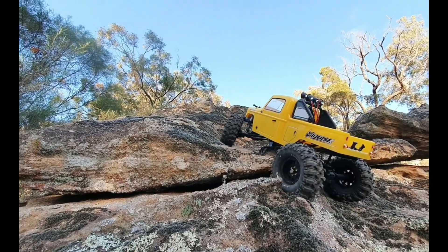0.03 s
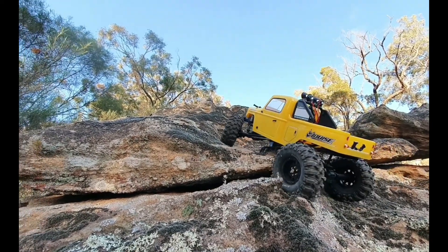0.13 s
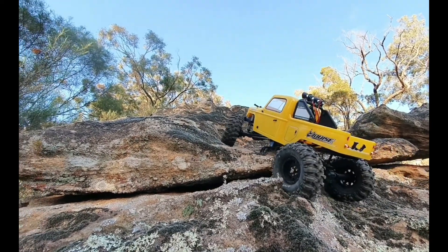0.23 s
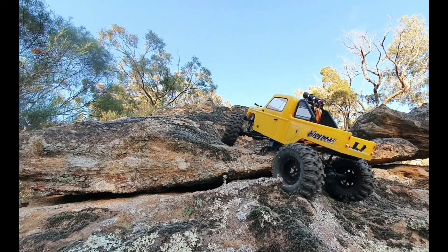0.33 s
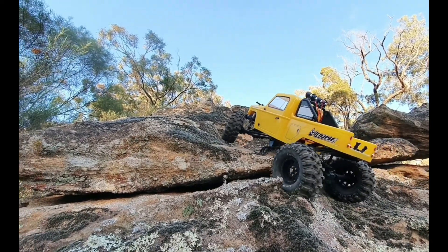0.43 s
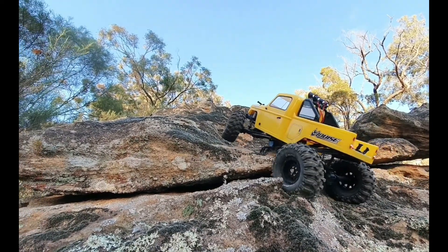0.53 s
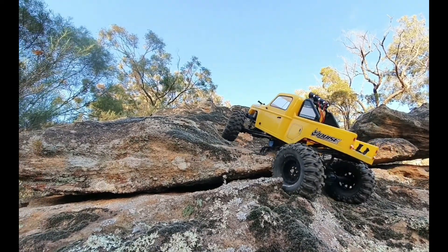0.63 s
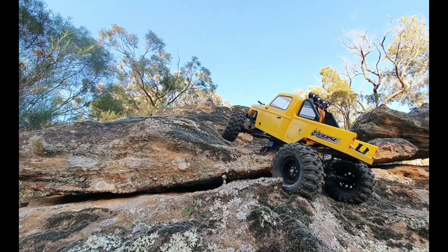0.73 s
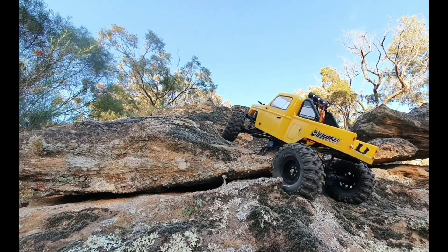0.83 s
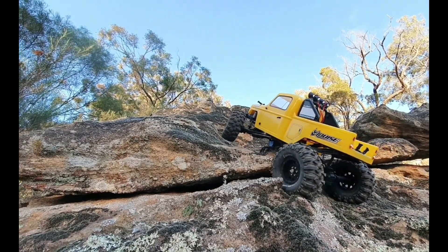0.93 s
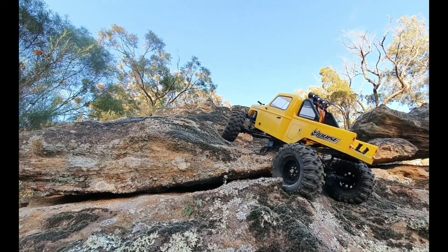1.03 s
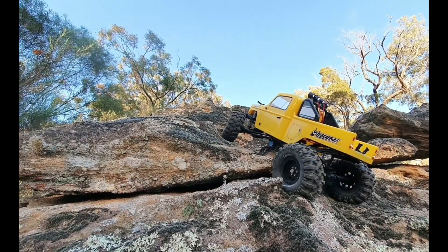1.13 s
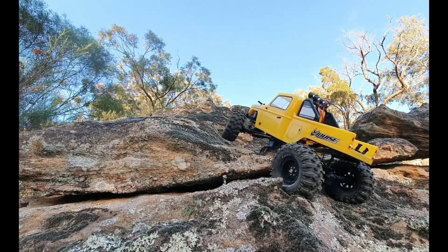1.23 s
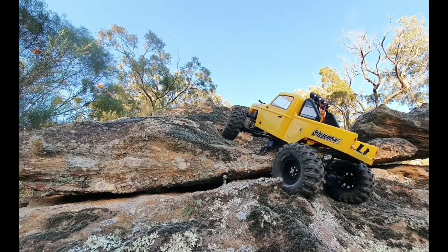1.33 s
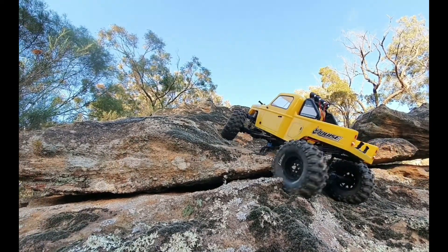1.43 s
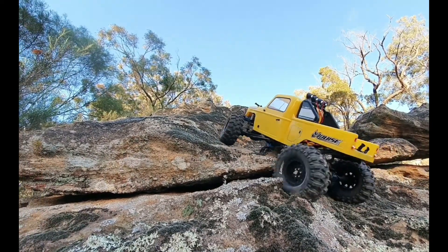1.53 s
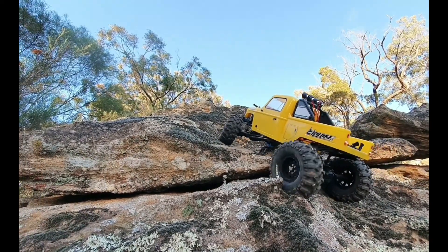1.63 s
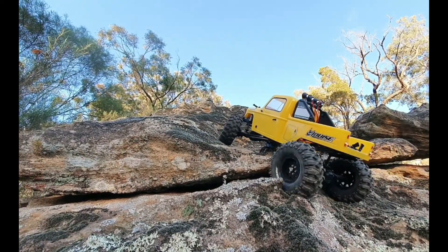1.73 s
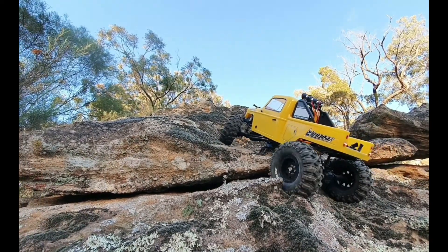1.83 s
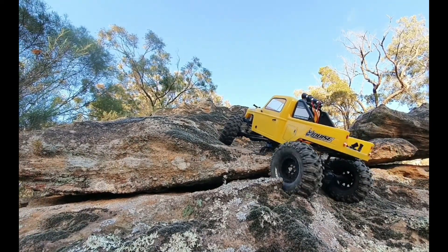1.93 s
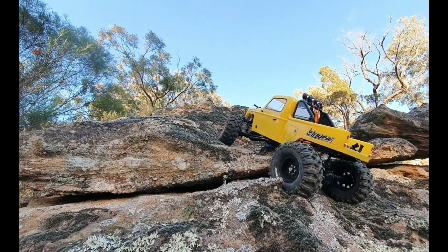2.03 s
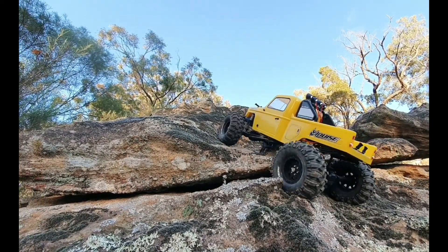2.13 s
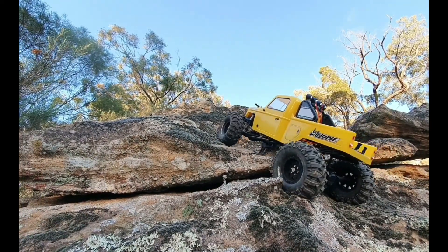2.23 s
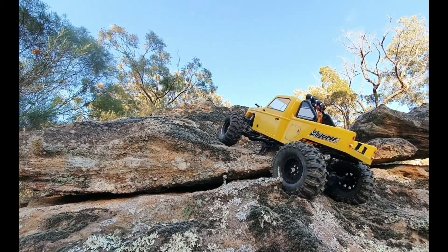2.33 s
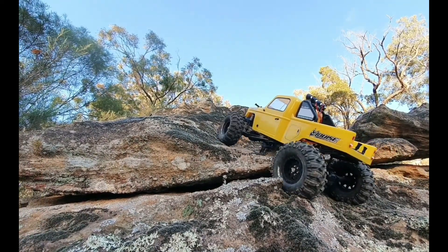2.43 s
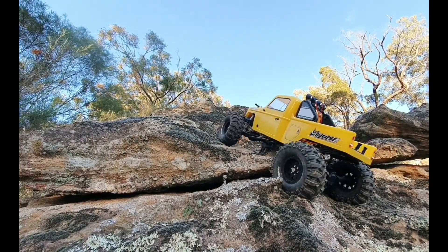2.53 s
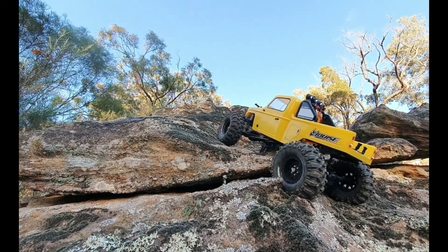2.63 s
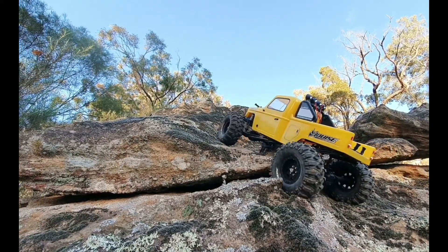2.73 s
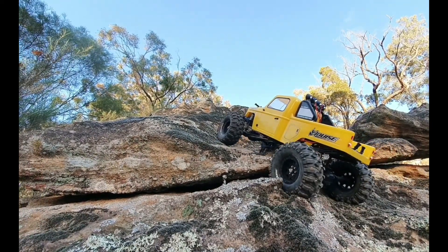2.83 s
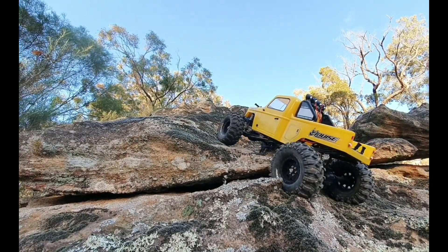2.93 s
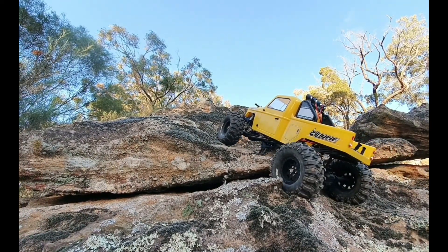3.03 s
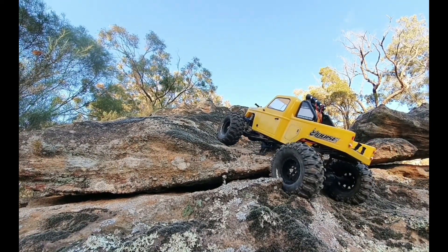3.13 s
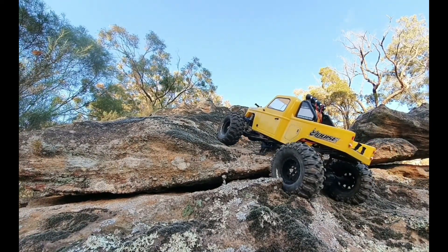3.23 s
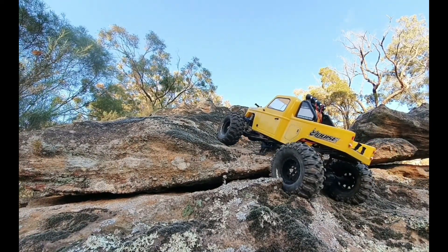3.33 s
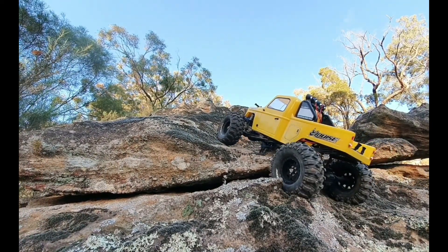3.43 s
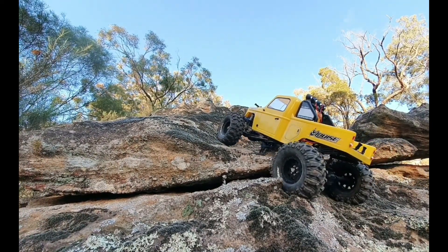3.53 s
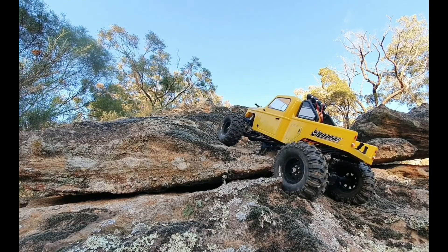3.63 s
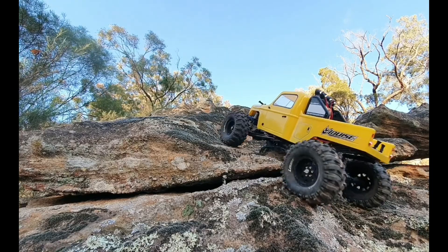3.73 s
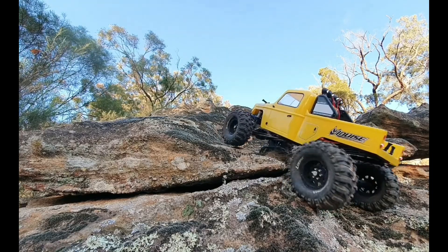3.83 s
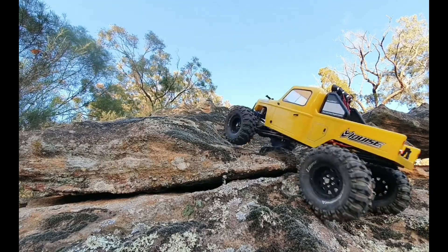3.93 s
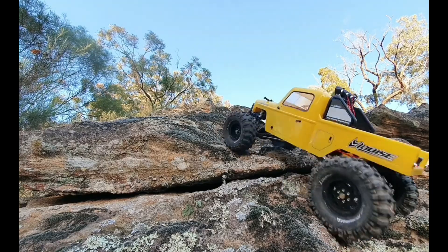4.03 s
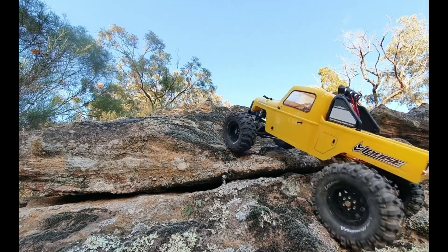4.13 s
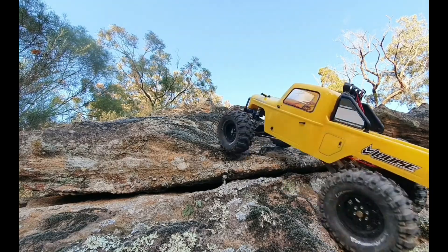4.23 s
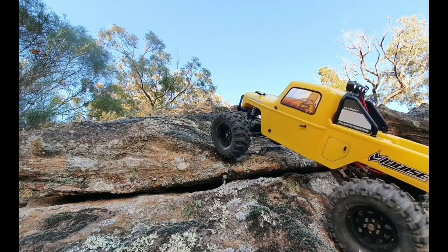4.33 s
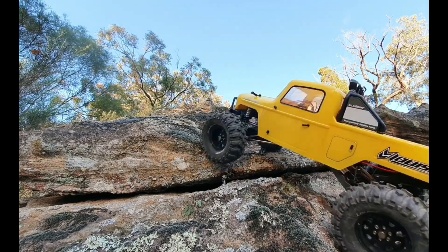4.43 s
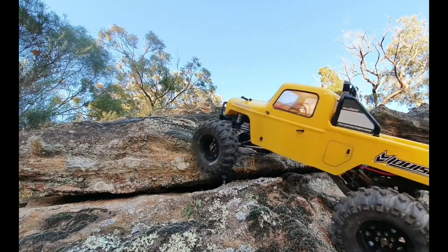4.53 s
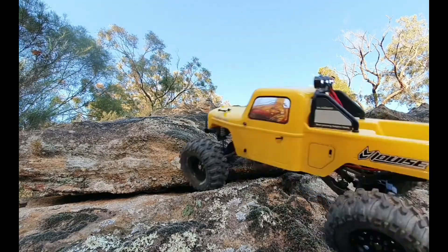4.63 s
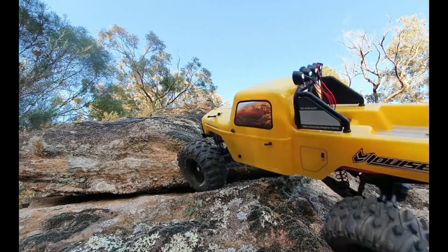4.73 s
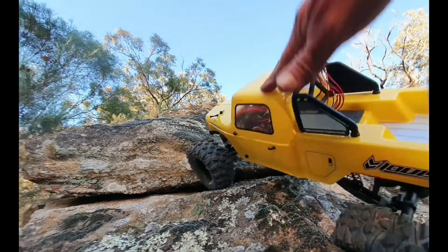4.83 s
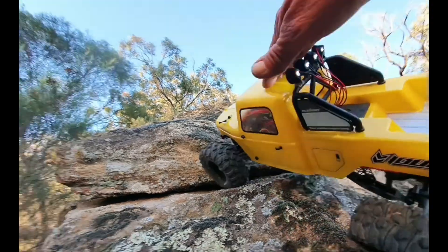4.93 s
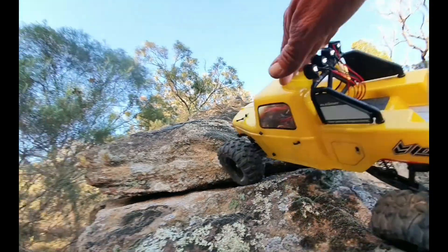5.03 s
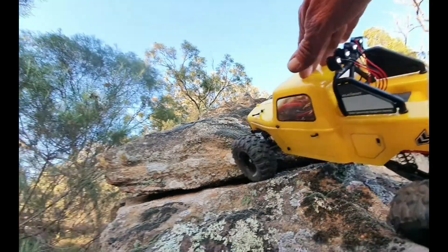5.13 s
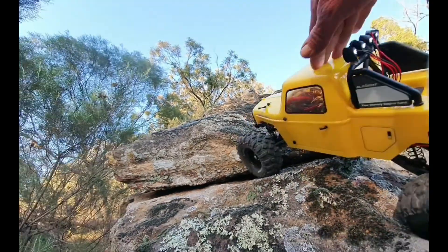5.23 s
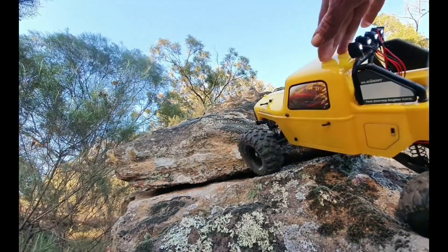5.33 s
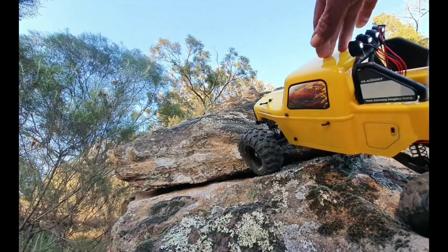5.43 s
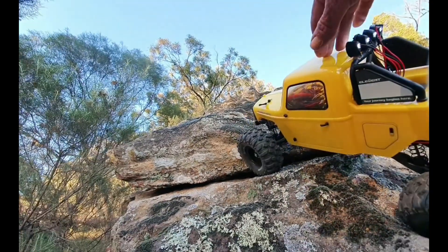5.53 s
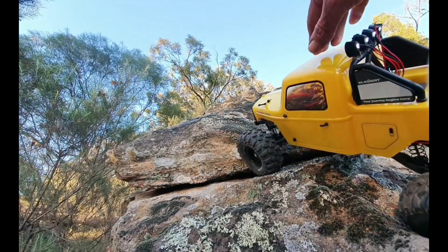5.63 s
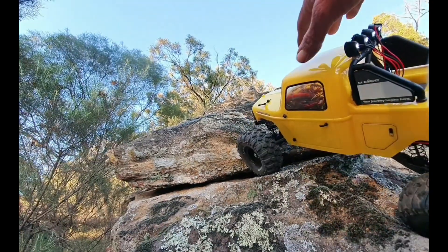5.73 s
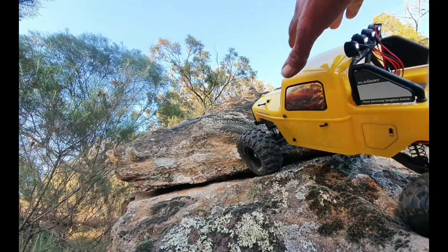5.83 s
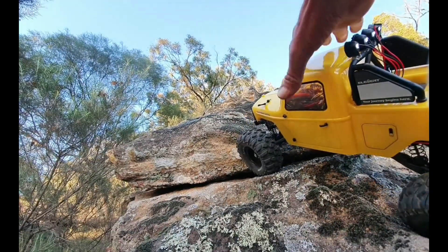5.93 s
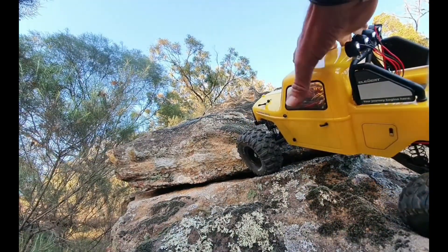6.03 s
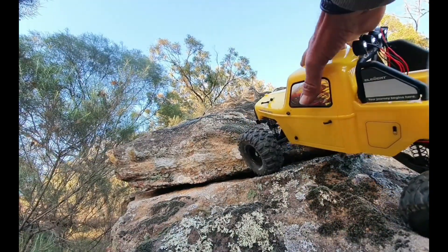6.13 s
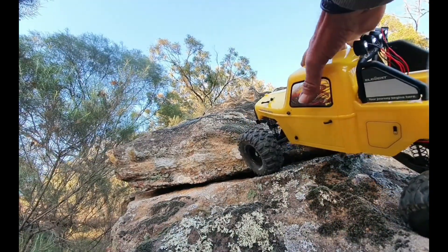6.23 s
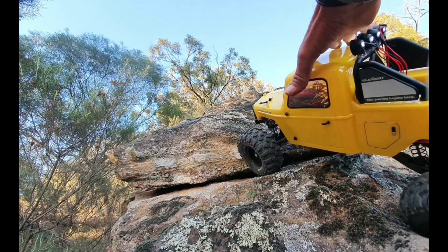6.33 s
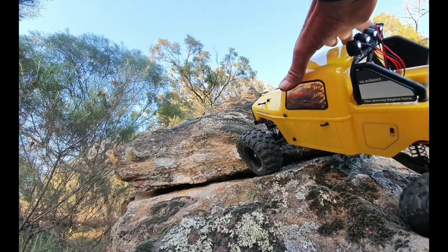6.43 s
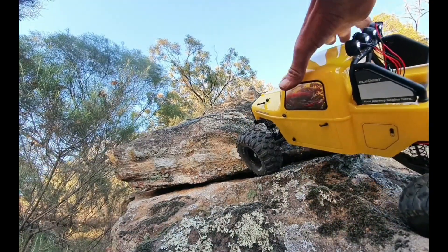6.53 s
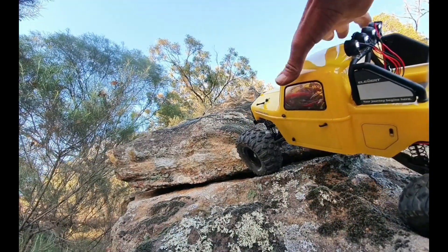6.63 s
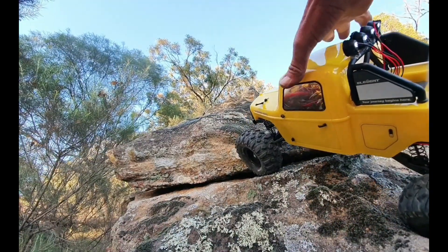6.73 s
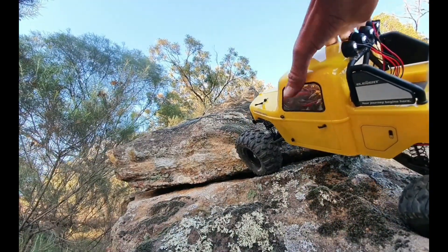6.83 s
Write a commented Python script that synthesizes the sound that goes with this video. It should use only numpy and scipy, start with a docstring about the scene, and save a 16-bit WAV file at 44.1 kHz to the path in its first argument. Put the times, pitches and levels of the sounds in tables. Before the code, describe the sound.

Close stereo microphone on a rocky outdoor spot, the truck slightly right. Faint rubbing, low hum and intermittent piercing electric whine come first, then a gritty burst of tyre scrubbing with clicks and gear rasp. A short skid squeaks and hisses. After a lull with faint distant chirping, dull tyre bumps gather into a loud plastic-shell clack with a deep bounce, followed by quiet scuffs and faint air.

```python
"""Tyres scrub and crunch on sandstone in short bursts, a high whine comes and goes, and one tyre squeals. Then come
bumps, a hard knock and small shifts: a radio-controlled truck claws at a ledge, rolls back and is moved by hand.
Filtered noise makes the rubbing, grit, gears and wind; fading tones make the knocks and bounces on the tyres.
Wavering tones make the whine, squeal and low hum. Faint air and far chirping lie underneath."""
import sys
import numpy as np
from scipy import signal
from scipy.fft import rfft, irfft, next_fast_len
from scipy.io import wavfile
from scipy.ndimage import uniform_filter1d, map_coordinates

SR = 44100
rng = np.random.default_rng(int(sys.argv[2]) if len(sys.argv) > 2 else 0)


def to_wav(sig):
    """Store sig (one row per channel, or 1-D mono) as 16-bit WAV at the path in sys.argv[1].

    Samples outside -1..1 are clipped; the rate is SR.
    """
    pcm = np.clip(np.atleast_2d(sig), -1, 1) * 32767
    pcm = np.round(pcm).astype(np.int16)
    wavfile.write(sys.argv[1], SR, pcm.T)  # frames by channels


N = 303716
TIME = np.arange(N) / SR  # seconds

# sharp noise of a strike or a bursting grain: (frequency [Hz], relative level per Hz [dB])
CRACK_COLOUR = [(400, -36), (1200, 0), (2700, -3), (4200, -0.5), (5200, -7), (6100, -4.5), (7200, -9.5),
                (11000, -15.5), (16000, -30.5)]


def amp(db):
    """Turn decibels into a gain."""
    return 10 ** (np.asarray(db) / 20)


def unit(x):
    """Scale to an average (rms) level of 1."""
    return x / np.sqrt(np.mean(x ** 2) + 1e-20)


def along(points, hz):
    """Read a curve of (frequency, value) points, with frequency on a log scale."""
    point_hz, values = np.transpose(points)
    return np.interp(np.log(hz + 1), np.log(point_hz + 1), values)


def wobble(rate):
    """Draw a smooth random curve through `rate` random points a second."""
    knots = rng.standard_normal(int(N * rate / SR) + 4)
    return map_coordinates(knots, [TIME * rate])


def filtered(x, response):
    """Multiply the spectrum of x by a response that depends on frequency."""
    size = next_fast_len(N + SR // 2)
    spectrum = rfft(x, size) * response(np.fft.rfftfreq(size, 1 / SR))
    return irfft(spectrum, size)[..., :N]


def through(x, kernel):
    """Pass both channels through one short response, scaled to unit energy."""
    return signal.fftconvolve(x, kernel[None] / np.linalg.norm(kernel), axes=1)[:, :N]


def coloured(x, spectrum):
    """Give x the colour of a spectrum with a filter that never sounds ahead of its input."""
    size = 4096
    cepstrum = irfft(np.log(amp(along(spectrum, np.fft.rfftfreq(size, 1 / SR)))))
    # folding the cepstrum packs the response as early as it can be (minimum phase)
    fold = np.r_[1, np.full(size // 2 - 1, 2), np.zeros(size // 2)]
    return through(x, irfft(np.exp(rfft(cepstrum * fold))))


def spread(pair):
    """Mix two unrelated signals into left and right, with a likeness that depends on frequency."""
    # (frequency [Hz], left-right likeness [0 to 1])
    likeness = [(100, 0.65), (800, 0.72), (1500, 0.15), (5000, 0.3), (7500, 0.33), (13000, 0.1994)]

    def mix(hz):
        turn = np.arccos(np.clip(along(likeness, hz), 0, 1)) / 2
        return np.array([np.cos(turn), np.sin(turn)])

    mid, side = filtered(pair, mix)
    return np.array([mid + side, mid - side])


def grains(rate, scatter_db, bed):
    """Friction noise: tiny crunches of unequal size at random moments, `rate` a second, on a smooth bed."""
    sizes = amp(scatter_db * np.minimum(rng.standard_normal(N), 2))
    hits = (rng.random(N) < rate / SR) * sizes
    crunch = np.convolve(hits, np.hanning(SR // 700), "same")  # each lasts 1.4 ms
    return unit((unit(crunch) + bed) * rng.standard_normal((2, N)))


def patchy(x, depth_db):
    """Shift the colour from moment to moment, as when the points of contact move."""
    tiles = signal.stft(x, nperseg=512)[2]
    field = rng.standard_normal(tiles.shape[1:])
    # smooth the random gains over frequency (axis 0) and time (axis 1)
    for axis, size in [(0, 3), (0, 2), (1, 7), (1, 5)]:
        field = uniform_filter1d(field, size, axis)
    shifted = tiles * amp(depth_db * unit(field))
    return unit(signal.istft(shifted, nperseg=512)[1][:, :N])


def swell(start, hold, rise, fall, db):
    """Gain of one attack, hold and release; rise and fall are the times for 20 dB."""
    before = np.maximum(start - TIME, 0) / rise
    after = np.maximum(TIME - start - hold, 0) / fall
    return amp(db) * 10 ** -np.minimum(before + after, 10)


def swells(rows, *slopes):
    """Add overlapping swells in power; slopes are a rise and fall shared by all rows."""
    return np.sqrt(sum(swell(*row[:-1], *slopes, row[-1]) ** 2 for row in rows))


def add(track, s, sound):
    """Mix a sound into the track at s seconds."""
    room = track[..., round(s * SR):][..., :sound.shape[-1]]
    room += sound[..., :room.shape[-1]]


def ring(t, scatter_db, damping):
    """The chassis and shell ring as fading tones, with new strengths for each blow."""
    # chassis and plastic shell: (frequency [Hz], relative level [dB], time to fall 60 dB at damping 1 [s])
    shell_modes = [(165, -17.5, 0.12), (345.8, -9, 0.18), (450, -2, 0.062), (557, 2.5, 0.039),
                   (624, 4, 0.039), (815, -6, 0.082), (940, -19, 0.11), (1179, -15.5, 0.13),
                   (1434, -24, 0.051)]
    hz, db, t60 = np.transpose(shell_modes)[:, :, None]
    strengths = db + scatter_db * rng.standard_normal(hz.shape)
    gains = amp(strengths - 60 * t * damping / t60)
    return np.sum(gains * np.sin(2 * np.pi * hz * t), axis=0)


def rattled(x):
    """Small plastic parts resonate when shaken: x through their short, fading tones."""
    # small plastic parts: (frequency [Hz], width [Hz], relative level [dB])
    part_modes = [(1145, 72, 0), (1276, 93, 1.5), (1652, 47, 2), (1775, 190, 0.5), (2220, 93, -2.5),
                  (2320, 69, 2), (2596, 260, 1.5), (3340, 880, -1), (4650, 1900, -15), (5840, 150, -13.5)]
    hz, width, db = np.transpose(part_modes)[:, :, None]
    t = TIME[:SR // 16]
    fade = width * np.exp(-np.pi * width * t)
    signs = np.resize([1, -1], hz.shape)
    return through(x, np.sum(amp(db) * fade * np.cos(2 * np.pi * hz * t) * signs, axis=0))


def ticks():
    """Single sand grains burst as sparse, sharp snaps of unequal size."""
    ticks_per_s, scatter_db, decay_s = 30, 4, .001
    sizes = amp(scatter_db * np.clip(rng.standard_normal(N), -2, 1.5))
    hits = (rng.random(N) < ticks_per_s / SR) * sizes
    snaps = signal.fftconvolve(hits, np.exp(-TIME[:SR // 100] / decay_s))[:N]
    return unit(coloured(snaps * rng.standard_normal((2, N)), CRACK_COLOUR))


def tyres():
    """Rubber lugs catch and let go, shaking shell and small parts, while sand grains crack under them."""
    # The next four tables share their columns; rise and fall are times for 20 dB, levels precede the trims:
    # (start [s], hold [s], rise [s], fall [s], scrub level [dB], rattle level [dB], sand level [dB])
    # a tyre slips over the rock
    scrapes = [(0.0, 0.062, .05, 0.12, -60.5, -65, -72.5), (0.165, 0.042, 0.13, 0.17, -73.5, -79, -69),
               (0.533, 0.26, 0.19, 0.2, -63.5, -68, -70), (0.72, 0.017, 0.037, 0.027, -51, -54, -62.5),
               (0.746, 0.024, .04, 0.41, -56, -68.5, -69.5), (1.553, 0.037, 0.073, .1, -50.5, -56, -64),
               (1.646, .1, 0.073, 0.15, -41.5, -51, -61.5), (1.746, .11, .06, 0.085, -38, -45, -54.5),
               (1.954, 0.017, 0.022, 0.11, -55, -63.5, -66),
               (2.993, 0.054, 0.087, 0.098, -64, -72.5, -76.5), (3.848, 0.14, 0.078, 0.092, -60, -68, -82),
               (4.013, .035, 0.13, 0.088, -53.5, -59, -73.5), (4.23, 0.083, 0.029, 0.061, -61, -74, -69),
               (4.848, 0.076, 0.025, 0.041, -42.5, -50.5, -61.5),
               (5.059, 0.054, 0.011, 0.083, -39, -46, -57), (5.291, 0.11, .1, 0.134, -64.5, -66, -75),
               (5.56, 0.05, 0.29, 0.14, -69.5, -75, -81), (6.346, 0.17, 0.15, 0.11, -68, -74, -77.5)]
    # the truck rolls back down over loose sand
    roll = [(3.87, 1.166, .065, 0.35, -62.5, -68.5, -70)]
    # a very faint, steady rubbing noise runs under the first 3.6 s
    faint_rubbing = [(0.0, 3.6, .12, 0.47, -86.5, -86.5, -90)]
    # a tyre skids on the spot
    spin = [(2.197, 0.14, 0.045, .1, -52, -58, -73)]
    # tread lugs flop onto the rock with a dull bump: (start [s], hold [s], level [dB])
    bumps = [(4.172, 0.012, -54.5), (4.265, 0.0041, -51), (4.3, 0.025, -47.5), (4.4, 0.042, -52.5),
             (4.478, 0.032, -46.5), (4.55, 0.013, -53.5), (4.69, 0.032, -48.5), (4.748, 0.024, -39),
             (5.365, 0.021, -59.5), (5.705, 0.023, -68), (6.36, 0.026, -54), (6.485, 0.011, -59)]
    # sliding rubber: (frequency [Hz], relative level per Hz [dB])
    slide_colour = [(25, -41), (70, -5.5), (140, -2), (250, -7.5), (430, -0.5), (650, -4.5), (850, -4.5),
                    (1150, -9), (1500, -14.5), (2500, -22), (6000, -56)]
    # lugs flopping on rock: (frequency [Hz], relative level per Hz [dB])
    flop_colour = [(25, -42), (70, 1), (140, 1.5), (240, -6), (430, 1.5), (650, -4.5), (880, -8),
                   (1150, -12), (1500, -17.5), (2500, -24), (6000, -48)]
    # crunching sand: (frequency [Hz], relative level per Hz [dB])
    grit_colour = [(800, -26.5), (2000, -13.5), (3500, -2.5), (5000, -1), (7000, -4), (10000, -6.5),
                   (13000, -10.5), (16000, -15.5)]
    scrub_trim_db, rattle_trim_db, sand_trim_db = 1.0, 0.5, 4
    bump_rise_s, bump_fall_s, bump_rattle_db, tick_db = 0.024, 0.053, -16, -11

    work = np.array([*scrapes, *roll, *faint_rubbing, *spin])
    rubbing, shaking, crushing = (swells(np.column_stack([work[:, :4], db])) for db in work[:, 4:].T)
    bumping = swells(bumps, bump_rise_s, bump_fall_s)
    grip_db = 1.4 * wobble(70)  # each catch lifts all the layers together

    slips = grains(rate=600, scatter_db=1.5, bed=1.0)
    shaken_shell = through(slips, ring(TIME[:SR // 8], scatter_db=2, damping=1))
    scrub = patchy(coloured(slips, slide_colour) + 0.13 * shaken_shell, depth_db=3.0)
    scrub = scrub * rubbing * amp(scrub_trim_db)

    # a lug that only flops down sounds duller than one that slides
    flops = coloured(grains(rate=560, scatter_db=1.9, bed=1.0), flop_colour)
    flops = patchy(flops, depth_db=1.0) * bumping

    parts = patchy(rattled(grains(rate=600, scatter_db=1, bed=1.0)), depth_db=4.0)
    rattle = parts * np.hypot(shaking, amp(bump_rattle_db) * bumping) * amp(rattle_trim_db)

    sand = coloured(grains(rate=260, scatter_db=1.0, bed=1.0), grit_colour)
    sand = patchy(sand, depth_db=3.5) + amp(tick_db) * ticks()
    grit = sand * crushing * amp(sand_trim_db + wobble(55))
    return spread((scrub + flops + rattle + grit) * amp(grip_db))


def whine(carrier_hz=9663, ripple_hz=172, ripple=0.15):
    """The speed controller's switching makes the motor windings sing, with a slight ripple."""
    # throttle pushes: (start [s], hold [s], base level [dB])
    pushes = [(0.0, .12, -73), (.28, .32, -75), (.69, .2, -69), (.965, .45, -65.5), (1.58, .2, -61.5),
              (1.86, .1, -73), (2.055, .035, -70), (2.8, .03, -75), (2.97, .12, -74), (3.37, .07, -85),
              (3.855, .1, -68.5), (3.99, .05, -71)]
    rise_s, fall_s = .075, .055  # for 20 dB
    waver_db = 1.3
    phase = 2 * np.pi * np.cumsum(carrier_hz + 9 * wobble(70)) / SR
    flutter = (1 + ripple * np.sin(2 * np.pi * ripple_hz * TIME)) * amp(waver_db * wobble(30))
    return np.sqrt(2) * np.sin(phase) * flutter * swells(pushes, rise_s, fall_s)


def noise(spectrum):
    """Steady noise of one colour, unrelated in the two channels."""
    return coloured(rng.standard_normal((2, N)), spectrum)


def hum():
    """A low tone hums with a wavering pitch and level."""
    # (time [s], base level [dB])
    hum_levels = [(0, -64), (.7, -66.5), (.82, -54.5), (1.3, -65.5), (1.65, -52.5), (2.25, -57),
                  (2.45, -73.5), (3.1, -60.5), (3.4, -73), (3.86, -54.5), (4.1, -67), (6.89, -83.5)]
    centre_hz, waver_hz = 92, 2.0
    phase = 2 * np.pi * np.cumsum(centre_hz + waver_hz * wobble(12)) / SR
    level_db = np.interp(TIME, *np.transpose(hum_levels)) + 2.7 * wobble(12)
    return np.sqrt(2) * np.sin(phase) * amp(level_db)


def wind():
    """Light wind and handling shake the microphone: deep noise with gusts and puffs."""
    # (frequency [Hz], relative level per Hz [dB])
    wind_colour = [(15, -51.5), (25, -23), (35, 1), (48, 2.5), (90, -3), (130, -12.5), (220, -26),
                   (600, -57)]
    # puffs of wind and handling on the microphone: (start [s], hold [s], base level [dB])
    buffets = [(1.8, 0.09, -47), (2.27, 0.048, -52), (2.6, 0.031, -63), (3.13, 0.078, -58),
               (3.85, 0.036, -53.5), (4.77, 0.14, -45.5), (5.1, 0.12, -52), (5.57, .03, -58),
               (6.28, 0.14, -59)]
    rise_s, fall_s = .09, .17  # for 20 dB
    port_share, flutter_db = .35, 3
    rumble = spread(noise(wind_colour)) + port_share * noise(wind_colour)  # partly different at the two ports
    breeze = amp(-64.5 + 1 * wobble(4.91))
    strength = np.hypot(breeze, swells(buffets, rise_s, fall_s))
    return rumble * strength * amp(flutter_db * wobble(18))


def still_air():
    """Faint background air: coloured noise with a slowly wavering level."""
    # (frequency [Hz], relative level per Hz [dB])
    air_colour = [(88, -32.5), (150, -12), (279, -10.5), (948, -21), (1110, -24.5), (1540, -27.5),
                  (1830, -26), (7000, -36), (15500, -43)]
    return noise(air_colour) * amp(-75.0 + 1.4 * wobble(2.014))


def chirping():
    """Far chirping: a faint band of noise that swells at each call."""
    # (centre time [s], time from centre until the call's own swell falls to 37 % [s])
    call_times = [(2.742, 0.04), (3.2, 0.025), (3.356, 0.047), (3.546, 0.018), (3.673, 0.079)]
    calls = sum(np.exp(-((TIME - s) / half) ** 2) for s, half in call_times)
    band = noise([(3000, -32.5), (4200, -3.0), (4800, -6.5), (6000, -33)])  # (Hz, relative dB per Hz)
    return patchy(band, depth_db=4.0) * (calls + 0.33) * amp(-81.5)


def outdoors():
    """The surroundings together; hum and wind get 3 dB more gain on the left."""
    return (hum() + wind()) * amp([[1.5], [-1.5]]) + still_air() + chirping()


def contacts():
    """Stones and chassis strike: the shell rings, a crack bursts and loose parts buzz for a moment."""
    # (time [s], thud peak level [dB], crack level before a 2 dB cut [dB])
    strikes = [(.054, -43, -39), (.272, -68, -49), (.587, -45, -48), (.648, -41, -54), (.728, -45, -43),
               (.995, -68, -55), (1.569, -34, -36), (1.603, -26, -47), (1.6855, -26, -31),
               (1.744, -23, -33), (1.754, -30, -31), (1.761, -20, -36), (1.803, -26, -36),
               (1.818, -27, -26), (1.92, -52, -44), (1.965, -54, -42), (2.333, -46, -40), (3.841, -47, -46),
               (3.946, -36, -36), (3.991, -28, -52), (4.172, -39, -49), (4.23, -42, -45), (4.354, -41, -50),
               (4.47, -35, -37), (4.666, -48, -45), (4.718, -35, -48), (4.745, -27, -40),
               (4.802, -18.5, -22), (4.857, -31, -33), (4.902, -33, -33), (4.923, -32, -34),
               (5.058, -22, -36), (5.0617, -12, -22), (5.0633, -10, -27), (5.068, -9, -16.5),
               (5.0745, -24, -23), (5.107, -25, -32), (5.149, -42, -40), (5.263, -54, -45),
               (5.285, -56, -50), (5.377, -47, -44), (5.52, -61, -51), (5.576, -60, -47), (6.353, -47, -46)]
    crack_rise_s = .0003
    thuds, cracks, t = np.zeros(N), np.zeros((2, N)), TIME[:SR // 4]
    for s, thud_db, crack_db in strikes:
        thud = ring(t, scatter_db=4, damping=1.3)
        add(thuds, s, amp(thud_db) * thud / np.abs(thud).max())
        # a sharp snap with a weaker, longer tail
        fade = np.exp(-t / 0.0015) + amp(-23.5) * np.exp(-t / 0.015)
        fade = fade * (1 - np.exp(-t / crack_rise_s))
        add(cracks, s, amp(crack_db - 2) * fade * rng.standard_normal((2, len(t))))
    return thuds + spread(coloured(cracks, CRACK_COLOUR) + .5 * rattled(cracks))


def gears():
    """Loaded teeth rasp through the resonances of their housing."""
    # gears straining under load; rise and fall for 20 dB: (start [s], hold [s], rise [s], fall [s], level [dB])
    strains = [(1.56, .06, .05, .1, -60), (1.65, .025, .05, .08, -52), (4.03, .015, .04, .05, -60)]
    # gear housing: (frequency [Hz], relative level per Hz [dB])
    housing_colour = [(1500, -36), (2400, -5), (2700, 14), (3000, -7), (3400, 11), (3800, -49), (4600, -60),
                      (9000, -69)]
    rasp = coloured(grains(rate=1100, scatter_db=2.0, bed=0.61), housing_colour)
    return spread(rasp * swells(strains))


def skid():
    """Rubber sliding fast hisses and squeals in a few rough, gliding tones."""
    # the squeal: (time [s], pitch of the lowest tone [Hz], base level [dB])
    squeal_path = [(2.16, 5050, -76), (2.2, 5080, -61), (2.215, 5200, -51), (2.235, 5800, -54),
                   (2.258, 5680, -53), (2.289, 4980, -46), (2.297, 5230, -51), (2.325, 5000, -62),
                   (2.36, 4950, -78)]
    # hiss at its fastest; rise and fall for 20 dB: (start [s], hold [s], rise [s], fall [s], level [dB])
    hiss_peak = [(2.24, 0.039, 0.069, 0.085, -50.5)]
    # the hiss: (frequency [Hz], relative level per Hz [dB])
    hiss_colour = [(700, -2), (1900, 15.5), (3500, -22), (4600, 11), (5400, 11.5), (7400, 11), (9000, 4),
                   (12000, 5.5), (14500, -3), (16000, -25.5)]
    roughness, flutter_db = .026, 2.5
    s, glide, squeal_db = np.transpose(squeal_path)
    pitch = np.interp(TIME, s, glide)
    pressure = amp(np.interp(TIME, s, squeal_db, -200, -200))  # silent outside the path
    squeal = np.zeros((2, N))
    for ratio, db in [(1, 3), (1.33, -2.5), (1.69, -6)]:
        # fast random pitch changes, separate in each channel, roughen the tone
        hz = ratio * pitch * (1 + roughness * np.array([wobble(2000), wobble(2000)]))
        tone = np.sin(2 * np.pi * np.cumsum(hz, axis=1) / SR)
        squeal += amp(db + flutter_db * wobble(180)) * tone
    hiss = coloured(grains(rate=1900, scatter_db=1.2, bed=0.9), hiss_colour)
    return spread(squeal * pressure + patchy(hiss, depth_db=5.0) * swells(hiss_peak))


def bounces():
    """The truck's weight bobs on its soft tyres; the note sags as the rubber unloads."""
    # (time [s], starting pitch [Hz], base level [dB])
    landings = [(4.753, 74, -26), (4.891, 65.3, -37.5), (5.068, 92, -14), (5.106, 94.2, -30)]
    attack_s, decay_s = .002, 0.029
    out, t = np.zeros(N), TIME[:SR // 2]
    sag = 1 - 0.081 * (1 - np.exp(-t / 0.22))
    for s, hz, db in landings:
        turns = hz * np.cumsum(sag) / SR
        fade = np.exp(-t / decay_s) * (1 - np.exp(-t / attack_s))
        add(out, s, amp(db) * np.sin(2 * np.pi * turns) * fade)
    return out


def scene():
    """The truck is right of centre: above the deep bass it is weaker on the left, and all but the whine is later."""
    # bearing of the truck: (time [s], delay of the left channel [samples])
    left_delay = [(0, 1.57), (1.2, 3.63), (1.8, 7.56), (3, 10.1), (4, 8.8), (5.1, 7.05), (5.7, 13.6),
                  (6.89, 12.5)]
    # (frequency [Hz], left minus right [dB])
    left_lean = [(60, 1), (200, -1.5), (500, -3.3), (1300, -3.8), (4000, -3), (15000, -3.8)]
    left, right = tyres() + gears() + skid() + contacts() + bounces()
    delay = np.interp(TIME, *np.transpose(left_delay))
    left = map_coordinates(left, [np.arange(N) - delay])
    truck = np.array([left, right]) + whine()
    truck = filtered(truck, lambda hz: amp(np.outer([.5, -.5], along(left_lean, hz))))
    return truck + outdoors()


def record(dry):
    """The camera rolls off the deepest bass and keeps nothing above its band limit."""
    low_cut_hz, top_hz = 36, 15850
    low_cut = signal.sosfilt(signal.butter(2, low_cut_hz, "highpass", fs=SR, output="sos"), dry)
    return filtered(low_cut, lambda hz: hz < top_hz)


dry = scene()
out = record(dry)
to_wav(out)
```